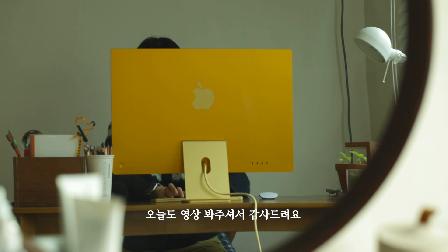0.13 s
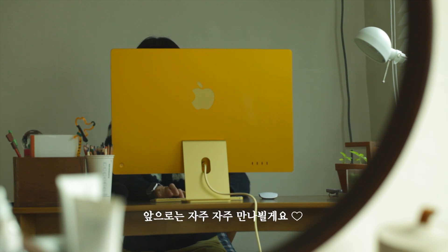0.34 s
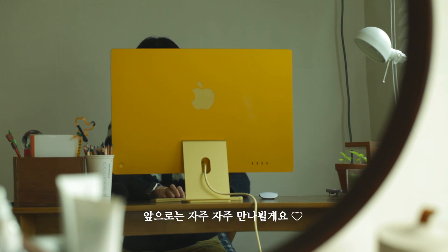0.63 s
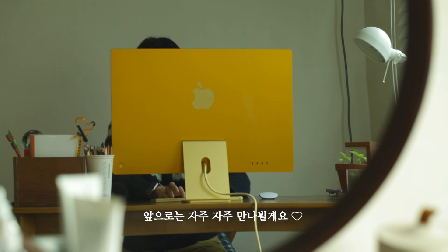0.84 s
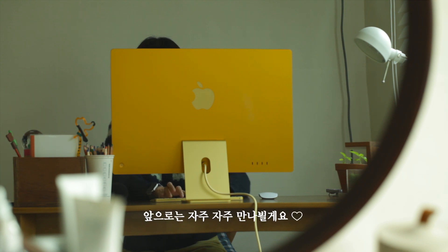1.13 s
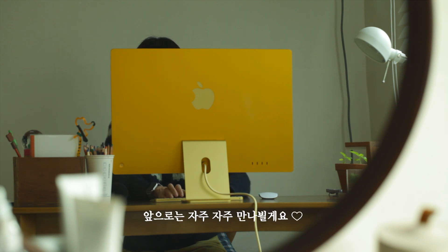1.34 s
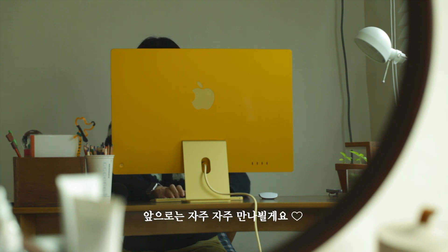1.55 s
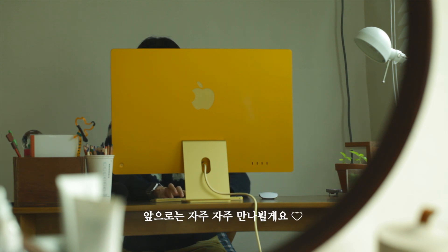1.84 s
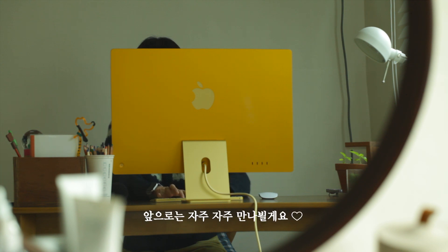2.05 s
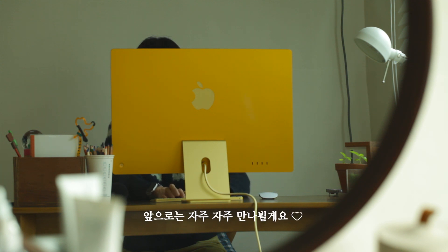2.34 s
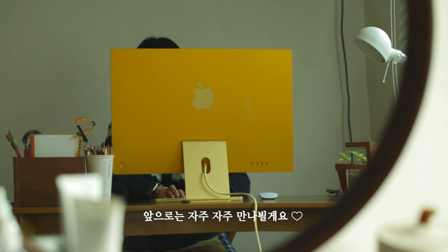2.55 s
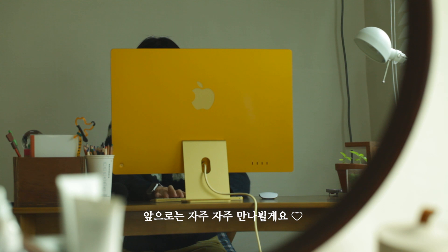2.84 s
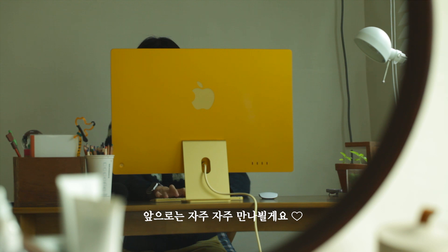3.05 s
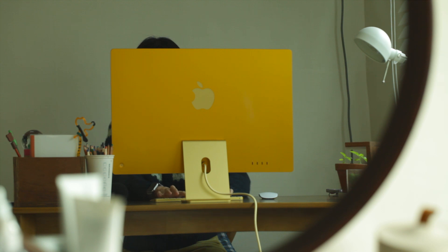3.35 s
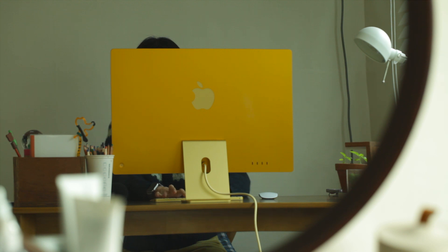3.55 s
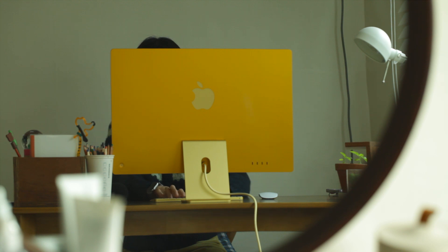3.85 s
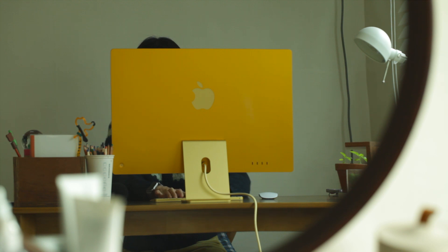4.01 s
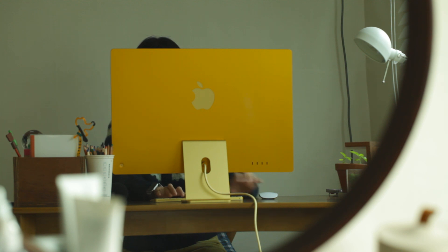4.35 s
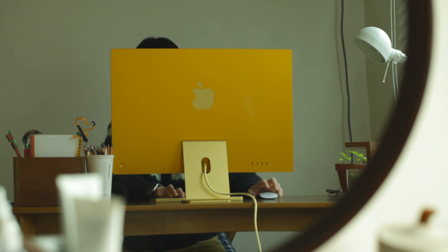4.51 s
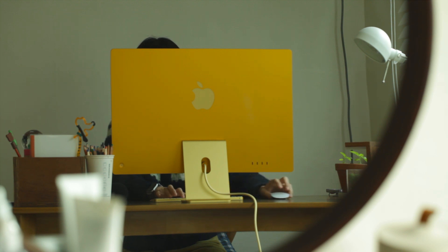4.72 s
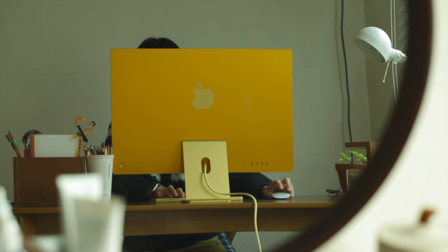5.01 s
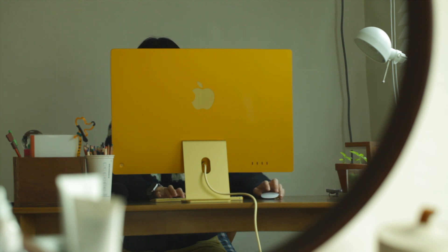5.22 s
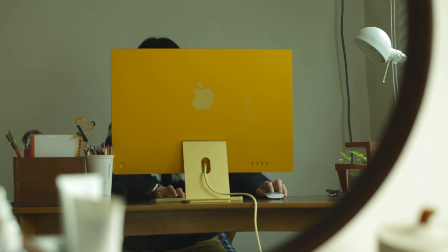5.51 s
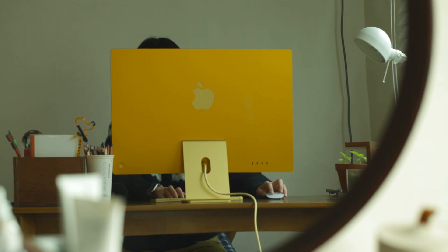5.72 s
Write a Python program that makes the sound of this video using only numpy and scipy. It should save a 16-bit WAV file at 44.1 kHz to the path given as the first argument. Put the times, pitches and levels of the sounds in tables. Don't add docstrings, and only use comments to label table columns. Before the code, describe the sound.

In a quiet small room, light plastic key clicks patter unevenly over soft desk thumps, followed by mouse knocks and short scraping slides.

```python
import sys
import numpy as np
from scipy import signal
from scipy.fft import rfft, irfft, next_fast_len
from scipy.io import wavfile
from scipy.ndimage import uniform_filter1d

SR = 44100
rng = np.random.default_rng(int(sys.argv[2]) if len(sys.argv) > 2 else 0)


def convert_level_to_amplitude(level_db):
    exponent = np.asarray(level_db, float) / 20
    return 10 ** exponent


def digitize_waveform(pressure):
    field = np.atleast_2d(pressure).T
    bounded = np.clip(field, -1, 1)
    quanta = np.round(bounded * 32767).astype(np.int16)
    wavfile.write(sys.argv[1], SR, quanta)


N = 259070

# (frequency [Hz], level [dB], build-up [ms])
BOARD_MODES = [(226.8, 2, 17.2), (163.1, 3.5, 12.3)]
# (start [s], length [s], fastest at share [0-1], scrape [dB], hiss over scrape [dB])
DRAGS = [
    (4.278, 0.74, 0.2, -77.5, 12.5),
    (4.502, 0.55, 0.16, -55, -2.5),
    (4.725, 0.17, 0.34, -53.5, -4),
    (4.941, 0.35, 0.55, -49.5, -5),
    (5.251, 0.11, 0.58, -59.5, -11),
    (5.415, 0.14, 0.27, -51.5, -10),
    (5.776, 0.11, 0.61, -62, -8.5),
]


def on_log(table, hz):
    f, v = np.transpose(table)
    return np.interp(np.log(np.maximum(hz, 1)), np.log(f), v)


def colour(x, gain):
    n = next_fast_len(x.shape[-1])
    spectrum = rfft(x, n) * gain(np.fft.rfftfreq(n, 1 / SR))
    return irfft(spectrum, n)[..., :x.shape[-1]]


def unit(x):
    return x / np.sqrt(np.mean(x ** 2))


def curve(table):
    s, *columns = np.transpose(table)
    return [np.interp(np.arange(N) / SR, s, c) for c in columns]


def place(times, sounds):
    out = np.zeros(N + sounds.shape[1])
    for s, sound in zip(times, sounds):
        i = max(int(s * SR), 0)
        out[i:i + len(sound)] += sound
    return out[:N]


def spread(mid, side, pan_db):
    return convert_level_to_amplitude(pan_db / 2 * np.array([[1], [-1]])) * np.array([mid + side, mid - side])


def peaks(table, f):
    return sum(convert_level_to_amplitude(db) / (1 + 1j * (f ** 2 - hz ** 2) / (width * f + 1)) for hz, width, db in table)


def tails(count, rise_s, t60, gain, grain_db, size):
    t = np.arange(size) / SR
    chance = rng.standard_normal((count, 3, size))
    grain = convert_level_to_amplitude(grain_db * 6.6 * uniform_filter1d(chance[:, 2:], size=64))
    noise = colour(chance[:, :2] * grain, gain)
    noise = noise / np.sqrt(np.mean(noise ** 2, axis=(1, 2), keepdims=True))
    return (noise * (1 - np.exp(-t / rise_s)) * convert_level_to_amplitude(-60 * t / t60)).swapaxes(0, 1)


def burst(ms, chance):
    age = np.maximum(np.arange(chance.shape[-1]) / SR - .002, 0) * 1000 / np.clip(ms, .2, 6)
    swell = age * np.exp(1 - age)
    rough_db = 2.5 * uniform_filter1d(chance[:, 2:], size=24) * np.sqrt(24)
    spectrum = rfft(chance[:, :2] * convert_level_to_amplitude(rough_db) * swell[:, None])
    power = uniform_filter1d(np.abs(spectrum) ** 2, size=20)
    return irfft(spectrum / power ** .28, chance.shape[-1])


def to_level(sound, db, ms):
    return convert_level_to_amplitude(db) * np.sqrt(.92 * ms * SR / 1000 / np.sum(sound ** 2, axis=1, keepdims=True))


def ring(modes, count, scatter_db, detune):
    t, out = np.arange(SR // 6) / SR, 0
    chance = rng.standard_normal((count, len(modes), 3))
    for k, (hz, db, peak_ms) in enumerate(modes):
        size, bend, turn = chance[:, k].T[:, :, None]
        age = t * 1000 / peak_ms
        hang = .09 * np.minimum(age, 1) * convert_level_to_amplitude(-60 * t / .3)
        swell = age ** 1.5 * np.exp(-age ** 1.45) + hang
        swell = swell / swell.max(axis=-1, keepdims=True)
        tone = np.sin(2 * np.pi * hz * (1 + detune * bend) * t + 3 * turn)
        out = out + convert_level_to_amplitude(db + scatter_db * size) * swell * tone
    return out


def board(s, db, second_db, ms):
    first, second = ([(hz, level_db, ms * rise / BOARD_MODES[0][2])] for hz, level_db, rise in BOARD_MODES)
    swing = ring(first, len(s), 0.071, 0.012) + convert_level_to_amplitude(second_db) * ring(second, len(s), 0.14, 0.034)
    side = convert_level_to_amplitude(-3.5) * ring([(233.2, 0.02, 7.2)], len(s), 2.5, 0.026)
    return spread(place(s[:, 0], convert_level_to_amplitude(db) * swing), place(s[:, 0], convert_level_to_amplitude(db) * side), 0.1)


def ticks(table, ms, width, side_db):
    s, db, hz = np.transpose(table)[:, :, None]

    def tone(f):
        return 1 / (1 + 1j * (f ** 2 - hz[:, None] ** 2) / (width * hz[:, None] * f + 1)) ** 2
    rattle = burst(ms * np.ones_like(s), rng.standard_normal((len(s), 3, 1024)))
    mid, side = colour(rattle, tone).swapaxes(0, 1)
    gain = to_level(mid, db, ms)
    mid, side = (place(s[:, 0] - .0025, gain * v) for v in (mid, side))
    return spread(mid, side * convert_level_to_amplitude(side_db), 1.1)


def air():
    # (frequency [Hz], density [dB per Hz])
    tone_colour = [(15, -26), (25, -5), (60, 8.5), (238, 11), (1000, -0.5), (1930, -3.5), (4240, -12.5),
                   (15200, -15)]
    # (time [s], level [dB])
    stir_levels = [
        (0, -62.5),
        (4, -60.5),
        (4.3, -51.5),
        (4.6, -54),
        (5.87, -69.5),
    ]
    # (time [s], level [dB])
    brushes = [
        (0, -42),
        (.75, -48),
        (3.35, -50.5),
    ]
    top_hz, tone_db, brush_s = 15700, -59.5, 0.024

    def rustle_gain(f):
        high = 1 / (1 + ((f - 4500) / 2500) ** 2)
        low = 1 / (1 + ((f - 1300) / 700) ** 2)
        return (f < top_hz) * (high + low) * f ** 2 / (f ** 2 + 1000 ** 2)
    stir_db, = curve(stir_levels)
    t = np.arange(N) / SR
    stir = convert_level_to_amplitude(stir_db) + sum(convert_level_to_amplitude(db) * np.exp(-np.abs(t - s) / brush_s) for s, db in brushes)
    still = unit(colour(rng.standard_normal((2, N)), lambda f: convert_level_to_amplitude(on_log(tone_colour, f)) * (f < top_hz)))
    rustle = unit(colour(rng.standard_normal((2, N)), rustle_gain))
    mid, side = convert_level_to_amplitude(tone_db) * still + convert_level_to_amplitude(-10.5) * stir * rustle
    return spread(mid, convert_level_to_amplitude(-2) * side, 0.086)


def drag(db):
    start, length, fastest = np.transpose(DRAGS)[:3, :, None]
    share = (np.arange(N) / SR - start) / length
    fastest = np.clip(fastest, .12, .7)
    speed = np.clip(np.minimum(share / fastest, (1 - share) / (1 - fastest)), 0, 1)
    level = convert_level_to_amplitude(db)[:, None] * np.sin(np.pi / 2 * speed) ** 1.5
    return np.sqrt(np.sum(level ** 2, axis=0))


def mouse():
    # (frequency [Hz], width [Hz], level [dB])
    shell_modes = [(350, 130, 0), (497, 40, 2), (650, 60, 3), (960, 150, 1), (1450, 400, -4),
                   (1865, 130, 3), (2450, 250, -5)]
    # (frequency [Hz], level [dB])
    rub_colour = [(2500, -5), (3500, 7), (5000, 4), (7000, -3.5), (10000, -6.5), (13000, -12), (16500, -36)]
    scrape_db, hiss_db = np.transpose(DRAGS)[3:]
    catch = convert_level_to_amplitude(1.8 * unit(uniform_filter1d(rng.standard_normal(N), size=260)))
    slips = rng.standard_normal((2, N)) * convert_level_to_amplitude(2.4 * rng.exponential(size=(2, N))) * catch
    shell = unit(colour(slips, lambda f: peaks(shell_modes, f) / (1 + (f / 2700) ** 16)))
    patchy = convert_level_to_amplitude(.8 * unit(uniform_filter1d(rng.standard_normal(N), size=900)))
    hiss = unit(colour(slips * patchy / np.sqrt(catch), lambda f: convert_level_to_amplitude(on_log(rub_colour, f)) * (f > 2500)))
    hum = unit(colour(slips, lambda f: peaks([(231, 16.0, 0)], f)))
    scrape = drag(scrape_db) * (convert_level_to_amplitude(4.0) * shell + convert_level_to_amplitude(1.5) * hum)
    mid, side = scrape + drag(scrape_db + hiss_db) * hiss
    return spread(mid, convert_level_to_amplitude(-7.5) * side, 1.7)


def more_thumps():
    # (time [s], peak [dB], second board mode [dB], build-up [ms])
    swings = [
        (2.318, -44, -10, 18),
        (3.848, -40, -5, 16.6),
    ]
    return board(*np.transpose(swings)[:, :, None])


def rings():
    # (time [s], peak [dB], frequency [Hz])
    clear_rings = [(.48, -45, 590), (1.244, -50, 1900), (1.822, -50.5, 1836), (2.224, -55, 1836),
                   (2.218, -57, 786), (2.521, -58, 1790), (2.522, -50, 803), (2.591, -49, 818),
                   (3.04, -49.5, 790), (3.287, -49, 1543), (4.539, -53, 640), (4.772, -33.5, 641),
                   (4.773, -34, 314)]
    t60_s = .16
    s, db, hz = np.transpose(clear_rings)[:, :, None]
    t = np.arange(8192) / SR
    mid = place(s[:, 0], convert_level_to_amplitude(db - 60 * t / t60_s) * np.sin(2 * np.pi * hz * t) * (1 - np.exp(-t * hz)))
    return spread(mid, .2 * mid, 0)


def edge():
    # (time [s], peak [dB], frequency [Hz])
    edge_blows = [(0.2927, -44, 284), (0.3272, -43.5, 292), (0.6684, -37.5, 370), (0.7778, -47, 290),
                  (0.9587, -47, 293), (1.381, -47, 298), (1.4087, -49, 294), (1.5646, -37.5, 287),
                  (1.6601, -42, 298), (1.8245, -38, 296), (1.9725, -44.5, 295), (2.0422, -51, 313),
                  (2.3264, -47.5, 310), (2.3802, -48, 318), (2.4882, -49.5, 380), (2.5173, -46, 293),
                  (2.8793, -46, 300), (3.363, -43, 306), (3.386, -48, 308), (3.6808, -43.5, 298),
                  (3.7995, -46, 293), (3.965, -53, 297), (4.5843, -43, 288), (4.647, -48, 293),
                  (4.714, -45, 290), (5.3543, -42.5, 280)]
    s, db, hz = np.transpose(edge_blows)[:, :, None]
    t = np.arange(4096) / SR
    age = t / 0.0039
    tone = np.sin(2 * np.pi * hz * t + 3 * rng.standard_normal((len(s), 1)))
    mid = place(s[:, 0] - .004, convert_level_to_amplitude(db + 1.0) * age * np.exp(1 - age) * tone)
    return spread(mid, 0.35 * mid, .1)


def desk():
    # (time [s], peak [dB], second board mode [dB], build-up [ms])
    thumps = [(0.014, -35.5, -5.5, 20.7), (0.142, -32.5, -6, 15), (0.294, -41, 0.5, 20),
              (0.48, -42.5, -2, 21), (0.589, -38.5, -2, 14.3), (0.674, -33, -7.5, 17.2),
              (1.108, -32, -6.5, 13.3), (1.24, -30.5, -5.5, 15.8), (1.348, -39, -3, 21),
              (1.386, -36.5, -6, 12.4), (1.423, -31.5, -4.5, 12.6), (1.561, -34.5, -2, 18.2),
              (1.672, -37, -0.5, 15.6), (1.824, -30.5, -7, 15.3), (1.975, -39.5, -5, 13.4),
              (2.225, -38.5, -7.5, 15.5), (2.526, -34.5, -9.5, 12), (2.604, -39, -11, 19.4),
              (2.795, -41, 5.5, 17), (2.892, -36.5, -14, 15.3), (3.028, -39, -7.5, 22),
              (3.283, -31, -10.5, 16.5), (3.376, -39, -6, 18.5), (3.523, -38.5, -10, 23),
              (3.612, -31.5, -9, 13.4), (3.811, -31.5, -4, 13.7), (3.965, -40, -8, 16.6),
              (4.08, -38, -6, 19), (4.146, -30, -9.5, 15.8), (4.234, -38.5, -6, 16)]
    # (time [s], peak [dB], second board mode [dB])
    pats = [(0.119, -43.5, -3), (0.221, -52, 11.5), (0.422, -45, -2), (0.538, -43, -3), (0.752, -43, -0.5),
            (.845, -56, -3), (0.962, -42.5, -6), (1.01, -46, 8.5), (1.487, -47.5, 2.5), (1.798, -51, 4),
            (1.928, -45.5, -6), (2.049, -42, -4), (2.156, -45.5, -7), (2.342, -41.5, -2.5),
            (2.381, -43.5, -2.5), (2.489, -46.5, 1), (2.681, -48, 5.5), (3.108, -43, 3), (3.159, -46.5, -7),
            (3.31, -52, -13), (3.464, -40.5, -13), (3.686, -41, -0.5), (3.945, -46, 6)]
    # (time [s], peak [dB], second board mode [dB], build-up [ms])
    drops = [(4.538, -29, -8.5, 17), (4.577, -34.5, -5.5, 18), (4.598, -29, -12.5, 17),
             (4.654, -34.5, -15, 16), (4.708, -47, -23, 19), (4.77, -21, -10.5, 7.6),
             (4.776, -24.5, -6.5, 16.3), (4.84, -39, -14, 13), (4.884, -37.5, -10, 21),
             (5.113, -40.5, -6, 17), (5.144, -43, -2.5, 25), (5.195, -34, -18, 26.4), (5.248, -66, -22, 12),
             (5.355, -40.5, -14, 17.5), (5.433, -46, -16, 13), (5.495, -48.5, -19, 19),
             (5.548, -42.5, -15, 18.4)]
    # (time [s], peak [dB])
    jolts = [
        (0.484, -33),
        (0.844, -43),
        (2.679, -38),
        (3.027, -40),
        (3.524, -36),
        (4.07, -33.5),
    ]
    # (frequency [Hz], level [dB], build-up [ms])
    frame_modes = [(73, -7.5, 21.5), (41.7, -20, 56), (106, -2.5, 3.4)]
    scatter_db = 1.5
    s, db, second_db, ms = np.transpose(thumps + [row + BOARD_MODES[0][2:] for row in pats])[:, :, None]
    shake_gain = convert_level_to_amplitude(-45.5 + 0.45 * (db + 36.5))
    mid, side = (place(s[:, 0] - .006, shake_gain * ring(frame_modes, len(s), scatter_db, 0.12))
                 for _ in range(2))
    jolt_s, jolt_db = np.transpose(jolts)[:, :, None]
    jolt = convert_level_to_amplitude(jolt_db) * ring(frame_modes[::2], len(jolts), scatter_db, 0.07)
    mid = mid + place(jolt_s[:, 0] - .006, jolt)
    drop_s, *drop = np.transpose(drops)[:, :, None]
    blows = board(s - .005, db, second_db, ms) + board(drop_s - .001, *drop)
    return blows + spread(mid, 1.45 * side, -4.5)


def knocks():
    # (time [s], peak [dB], ring [Hz])
    contacts = [(0.138, -44, 325), (0.217, -47.5, 330), (0.479, -45, 385), (0.581, -53, 417),
                (0.665, -44, 355), (0.956, -59, 388), (1.1, -44, 360), (1.223, -50.5, 526),
                (1.24, -42, 304), (1.339, -41.5, 314), (1.679, -44, 362), (1.817, -43, 315),
                (2.219, -52, 780), (2.52, -51, 373), (2.592, -43.5, 840), (2.786, -53, 476),
                (3.041, -40.5, 790), (3.101, -48, 400), (3.182, -48, 612), (3.27, -35, 362),
                (3.457, -53.5, 800), (3.507, -43.5, 316), (3.608, -45, 365), (3.68, -54, 404),
                (3.803, -47.5, 318), (3.831, -50.5, 580), (4.064, -41, 776), (4.137, -35.5, 1020),
                (4.229, -48, 422)]
    # (time [s], peak [dB], ring [Hz])
    taps = [(.004, -44.5, 610), (0.48, -43, 630), (.482, -56, 770), (4.54, -32, 640), (4.583, -35.5, 464),
            (4.596, -32, 650), (4.597, -35.5, 442), (4.645, -48, 406), (4.769, -27, 960), (4.771, -37, 480),
            (4.886, -40.5, 563), (5.352, -47, 430), (5.431, -42.5, 597), (5.545, -45.5, 406),
            (5.819, -57.5, 613)]
    # (frequency [Hz], width [Hz], level [dB])
    wood_modes = [(315, 43, 11.5), (353, 170, -1), (450, 96, 0.5), (617, 6.7, 5.5), (818, 11.4, 5.5),
                  (960, 65, -4), (1400, 740, -11)]
    spot_t60_s, least_width_hz = .075, 40
    s, db, hz = np.transpose(contacts + taps)[:, :, None]
    t = np.arange(6144) / SR
    swell = (1 - np.exp(-t * hz / 0.36)) * convert_level_to_amplitude(-60 * t / spot_t60_s)
    spot = convert_level_to_amplitude(0.5) * np.sin(2 * np.pi * hz * t) * swell
    damped = [(mode_hz, max(width, least_width_hz), mode_db) for mode_hz, width, mode_db in wood_modes]

    def wood(f):
        near = 1 / (1 + (np.log2(f / hz[:, None] + 1e-9) / 0.64) ** 2)
        return peaks(damped, f) / (1 + (f / 2800) ** 6) * (convert_level_to_amplitude(2.5) + near)
    crack = convert_level_to_amplitude(4.0) * tails(len(s), 0.00065, 0.04, wood, 0.18, size=len(t))
    after = convert_level_to_amplitude(-9.5) * tails(len(s), 0.00037, 0.36, wood, 0.54, size=len(t))
    mid, side = (place(s[:, 0] - .001, convert_level_to_amplitude(db) * v) for v in crack + after + [spot, 0.22 * spot])
    return spread(mid, 0.55 * side, 0.18)


def case():
    # (time [s], peak [dB], favoured frequency [Hz])
    wide_keys = [(0.14, -45.5, 1990), (0.3, -37, 1850), (0.4198, -46, 2200), (0.5804, -44.5, 1810),
                 (1.2398, -33, 2210), (1.338, -37, 1870), (1.4156, -39, 2200), (1.8189, -34.5, 2200),
                 (1.921, -37.5, 2180), (2.2204, -36, 1820), (2.5184, -37, 1790), (3.27, -47, 1400),
                 (3.282, -27, 1480), (3.4576, -41, 1670), (3.507, -34.5, 1230), (3.8003, -36, 2120),
                 (4.134, -65, 1600)]
    # (frequency [Hz], width [Hz], level [dB])
    case_modes = [(1766, 44, -2), (1600, 150, -0.5), (2140, 73, -2.5), (1300, 150, -5)]
    least_width_hz = 85
    s, db, hz = np.transpose(wide_keys)[:, :, None]
    damped = [(mode_hz, max(width, least_width_hz), mode_db) for mode_hz, width, mode_db in case_modes]
    bend = 1 + 0.01 * rng.standard_normal((len(s), 1, 1))

    def hollow(f):
        return peaks(damped, f * bend)

    def favoured(f):
        return hollow(f) * (.5 + 1 / (1 + ((f - hz[:, None]) / 170) ** 2))
    rattle = tails(len(s), 0.00031, 0.058, favoured, 1.5, size=3072)
    diffuse = convert_level_to_amplitude(-15) * tails(len(s), 0.002, 0.46, hollow, 1.3, size=6144)
    mid, side = (place(s[:, 0], convert_level_to_amplitude(db - 7) * a) + place(s[:, 0], convert_level_to_amplitude(db - 7) * b)
                 for a, b in zip(rattle, diffuse))
    return spread(mid, 0.45 * side, 0.62)


def clacks():
    # (time [s], level [dB], ring [Hz])
    dull_clacks = [(0.0013, -43, 1380), (0.4324, -48, 2240), (0.8192, -46.5, 2690), (1.0952, -59, 1310),
                   (1.1064, -48, 1680), (1.2833, -48, 1800), (1.3812, -45, 2470), (1.4162, -37.5, 2270),
                   (1.8758, -52, 1840), (1.9515, -53, 1780), (2.3195, -46, 2600), (2.6868, -53, 2500),
                   (2.7714, -52, 1770), (2.9969, -49, 2300), (3.1034, -49, 1350), (3.6059, -40, 2770),
                   (4.0655, -39, 2620), (4.6133, -34.5, 1620), (4.646, -38, 1790), (4.6589, -41, 1820),
                   (4.933, -47, 1840), (4.9801, -48, 1860), (5.0749, -36, 1830), (5.298, -58, 1820)]
    return ticks(dull_clacks, 0.82, 0.16, -18)


def rebounds():
    # (time [s], level [dB], ring [Hz])
    cap_ticks = [(0.2195, -47, 10270), (0.5749, -56, 5050), (0.6939, -48, 5600), (0.7359, -45, 6200),
                 (0.9894, -51, 8380), (1.0078, -50, 9920), (1.102, -38, 9740), (1.1294, -46, 5540),
                 (1.2332, -48, 4040), (1.3466, -40, 4900), (1.3829, -44, 5350), (1.5324, -46, 5250),
                 (1.6792, -39, 5920), (1.7939, -48, 7200), (1.8128, -42, 6110), (1.9379, -36.5, 7120),
                 (1.9454, -44, 5310), (2.2044, -48, 3670), (2.3464, -42, 5960), (2.3768, -48, 5000),
                 (2.4259, -53, 4950), (2.5136, -39, 3710), (2.6146, -52, 4140), (2.7143, -45, 4120),
                 (2.8869, -41, 3450), (3.0179, -48, 4720), (3.0471, -40, 4110), (3.1848, -50, 4360),
                 (3.2744, -36, 5510), (3.2777, -38, 5920), (3.3732, -50, 8000), (3.4589, -46, 2600),
                 (3.6069, -40.5, 5570), (3.6813, -48, 5000), (3.7872, -51, 5200), (3.801, -59, 2500),
                 (3.9294, -47, 5020), (4.0202, -52, 5660), (4.2206, -44, 6680)]
    return ticks(cap_ticks, 0.77, 0.73, -10)


def keys():
    # (time [s], level [dB], cap ring [Hz], brightness [dB], swell [ms])
    strokes = [(0.1081, -36.5, 4730, -8.5, 1.2), (0.422, -35.5, 6140, -12.5, 1),
               (0.4795, -29.5, 4070, -9.5, 0.66), (0.5424, -32.5, 4430, -12, 0.5),
               (0.6606, -26, 5860, -5.5, 0.96), (0.8527, -35, 6660, -14, 0.8),
               (0.998, -33.5, 11100, -16.5, 1.1), (1.0949, -28, 8550, -8.5, 0.98),
               (1.2209, -31, 5300, -4, 0.65), (1.3373, -27, 5000, -16, 0.91),
               (1.359, -24, 4270, -11.5, 0.44), (1.41, -30.5, 6050, -5.5, 1.1),
               (1.4808, -31.5, 5150, -14, 0.43), (1.6531, -27, 7160, -7.5, 0.79),
               (1.923, -25, 9600, -14.5, 0.4), (2.036, -35.5, 5500, -12.5, 1.05),
               (2.3197, -25.5, 5670, -7, 0.4), (2.3358, -28.5, 6100, -5, 1), (2.518, -33, 5250, -13, 0.98),
               (2.5903, -23, 5300, -13.5, 0.6), (2.692, -36, 4240, -17, 1.7),
               (2.878, -27.5, 5200, -5, 0.79), (3.0379, -31, 6100, -9, 0.65),
               (3.253, -30.5, 7700, -21.5, 1), (3.5039, -33, 3100, -12.5, 1.46),
               (3.602, -31, 5400, -6.5, 0.79), (3.9548, -28.5, 3970, -9.5, 0.8),
               (4.0617, -26.5, 5330, -13.5, 0.65), (4.1375, -27, 4280, -11, 0.89),
               (4.2273, -38, 7050, -6, 3)]
    # (time [s], peak [dB], cap ring [Hz])
    lifts = [(.0034, -41, 5730), (0.1378, -36.5, 6700), (0.212, -36, 4130), (.253, -44, 4660),
             (0.299, -37, 5760), (0.58, -40, 2750), (.617, -45.5, 4550), (0.723, -39, 6000),
             (.82, -33.5, 8440), (.88, -37, 6500), (0.9512, -47, 4730), (1.536, -34, 8240),
             (1.703, -44.5, 4440), (1.799, -36, 9300), (2.149, -42, 5300), (2.2204, -35, 3300),
             (2.3821, -37, 5100), (2.486, -40.5, 4530), (2.6511, -35, 6640), (2.7708, -37, 3000),
             (2.9966, -41.5, 4500), (3.0982, -41.5, 4700), (3.1567, -40.5, 8700), (3.3636, -41.5, 4200),
             (3.443, -39, 6200), (3.645, -37, 6500), (3.7782, -35, 5750), (3.8312, -31, 5130),
             (5.614, -39.5, 6540), (5.702, -47, 8200)]
    # (time [s], peak [dB], cap ring [Hz])
    bounces = [(0.017, -39, 5130), (0.6656, -32.5, 6500), (1.091, -31.5, 6000), (0.683, -39, 5700),
               (1.106, -32, 5900), (1.371, -46, 4300), (2.107, -54, 5640), (3.063, -47, 4000),
               (3.297, -50, 4300), (1.648, -50, 7000), (1.2403, -31.5, 4520), (1.557, -37, 5300),
               (1.819, -32, 5640), (2.073, -44, 4400), (2.492, -40, 4520), (2.676, -36.5, 5940),
               (2.706, -39, 4150), (2.787, -41.5, 3030), (2.9028, -43, 5300), (3.105, -40.5, 3750),
               (3.19, -39, 3800), (3.271, -36, 4180), (3.2845, -36, 2500), (3.513, -38, 6100),
               (3.545, -37, 6100), (3.8567, -34.5, 6740), (3.941, -42, 5320), (3.972, -37, 5770),
               (4.2347, -30, 7060)]
    # (frequency [Hz], level [dB])
    cap_colour = [(1200, -4), (2500, 0), (4000, 3), (5700, 6), (7500, -1.5), (10000, 0.5), (13000, -9),
                  (16000, -15.5)]
    light_db, light_ms, light_scatter_db = -2.5, 0.7, 5
    light_bright_db, bright_scatter_db = -12.5, -1.5
    luck = rng.standard_normal((len(lifts + bounces), 2))
    light = [(s, db + light_db, hz, light_bright_db + bright_scatter_db * x, light_ms * convert_level_to_amplitude(light_scatter_db * y))
             for (s, db, hz), (x, y) in zip(lifts + bounces, luck)]
    s, db, hz, bright_db, ms = np.transpose(strokes + light)[:, :, None]
    rattle = burst(ms, rng.standard_normal((len(s), 3, 1536)))
    shape = rng.standard_normal((len(s), 4, 1))

    def cap(f):
        octave = np.log2(f / 6500 + 1e-9)
        tilt_db = (bright_db + 15.5) * np.clip(octave * 2.3, 0, 1)
        patch_db = 1.5 * np.sin(7 * octave + 3 * shape[:, 0]) + 2.5 * np.sin(15 * octave + 3 * shape[:, 1])
        own_ring = 1 + 1.76 / (1 + ((f - hz) / (0.1 * hz)) ** 2)
        return convert_level_to_amplitude(on_log(cap_colour, f) + tilt_db + patch_db) * own_ring

    def scattered(f):
        return np.sqrt(cap(f)[:, None] * convert_level_to_amplitude(on_log(cap_colour, f)))
    mid, side = (colour(rattle[:, k], cap) for k in range(2))
    gain = to_level(mid, db, ms)
    side = colour(side, lambda f: convert_level_to_amplitude(-18.5) + (f / 16000) ** 2.0)
    mid, side = (place(s[:, 0] - .002, gain * v) for v in (mid, side))
    early = convert_level_to_amplitude(-16.5) * tails(len(s), 0.002, 0.068, scattered, 2.8, size=3072)
    late = convert_level_to_amplitude(-27.5) * tails(len(s), 0.0021, 0.38, lambda f: scattered(f) / (1 + (f / 9000) ** 2), 4.7, size=6144)
    near, far = (place(s[:, 0], convert_level_to_amplitude(db) * a) + place(s[:, 0], convert_level_to_amplitude(db) * b) for a, b in zip(early, late))
    return spread(mid + near, side + 0.59 * far, 0.92)


def scene():
    wood = more_thumps() + rings() + edge() + desk() + knocks()
    return air() + mouse() + wood + case() + clacks() + rebounds() + keys()


def band_limit(x):
    return signal.sosfilt(signal.butter(12, 16830, fs=SR, output="sos"), x)


def record(dry):
    top_hz = 16350
    cut = colour(dry, lambda f: 1 / (1 + (f / top_hz) ** 200))
    return band_limit(cut)


dry = scene()
out = record(dry)
digitize_waveform(out)
```